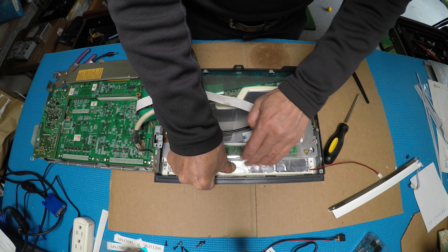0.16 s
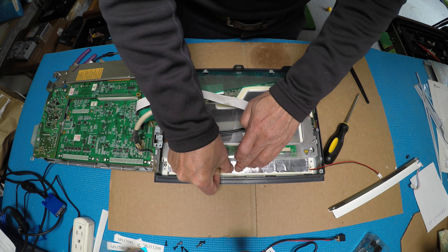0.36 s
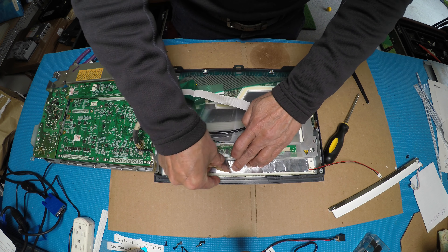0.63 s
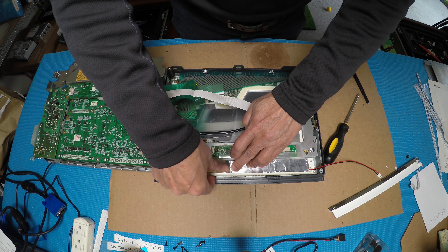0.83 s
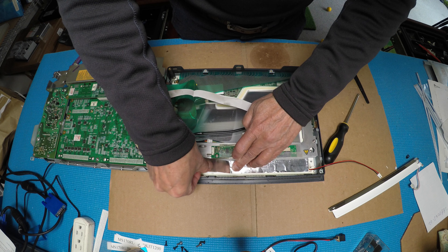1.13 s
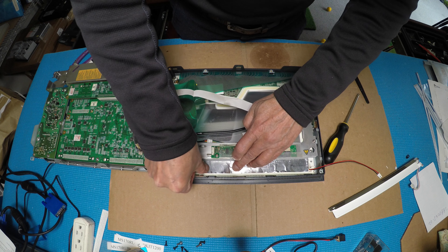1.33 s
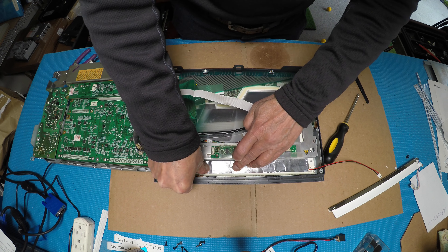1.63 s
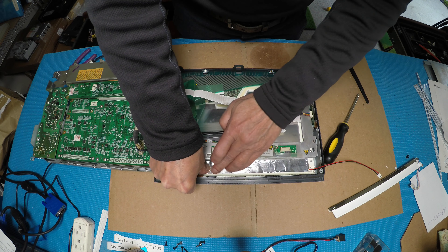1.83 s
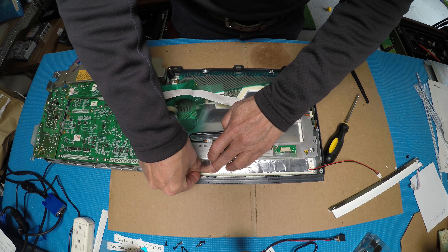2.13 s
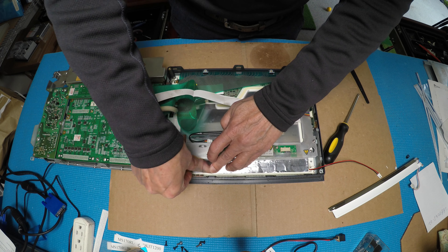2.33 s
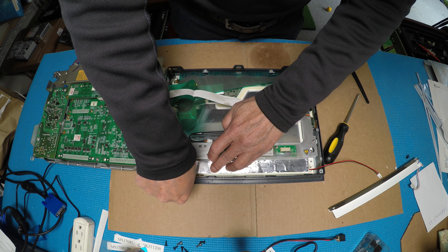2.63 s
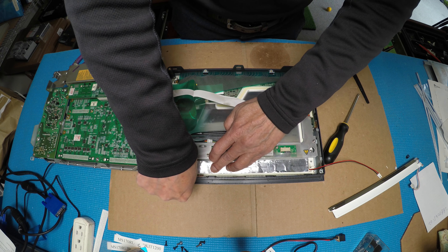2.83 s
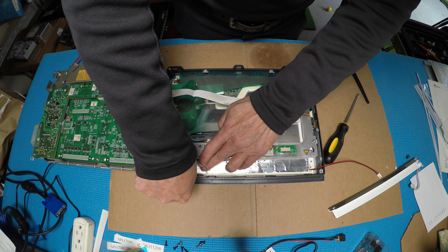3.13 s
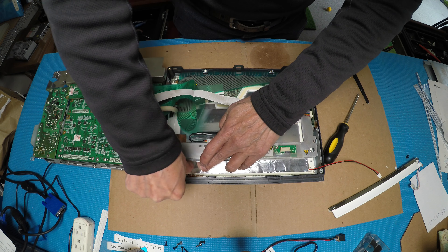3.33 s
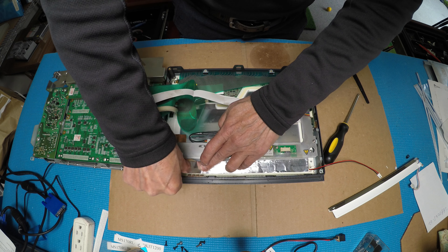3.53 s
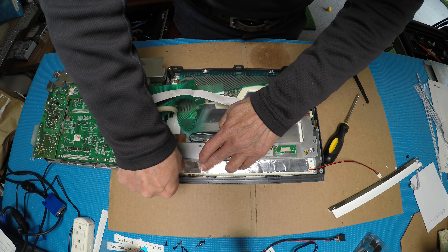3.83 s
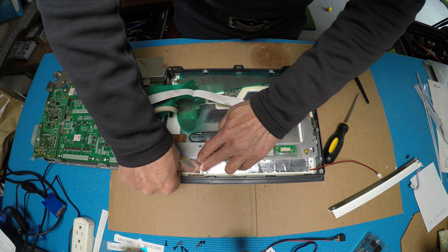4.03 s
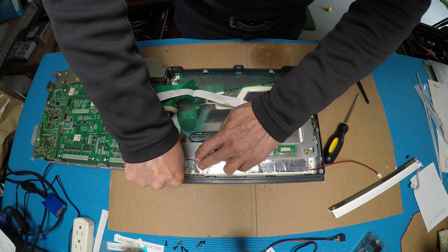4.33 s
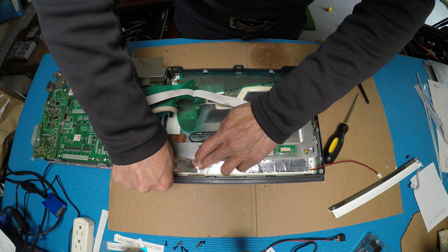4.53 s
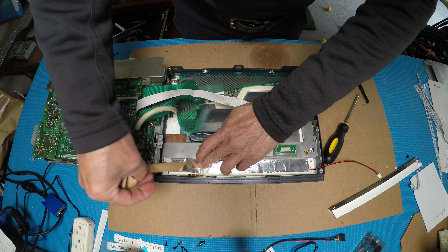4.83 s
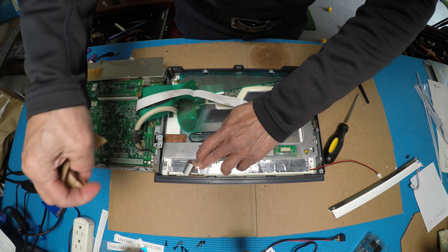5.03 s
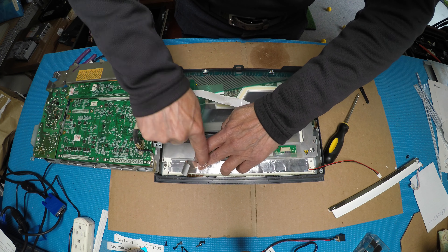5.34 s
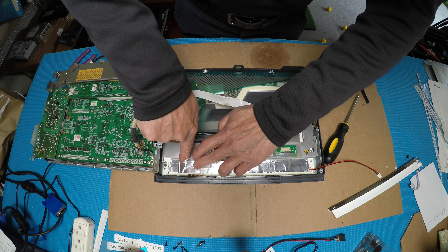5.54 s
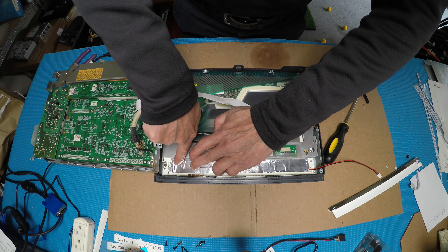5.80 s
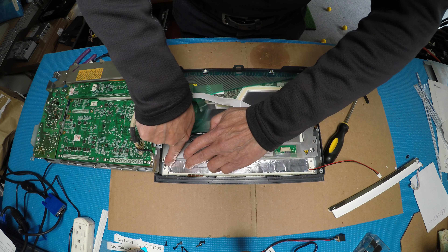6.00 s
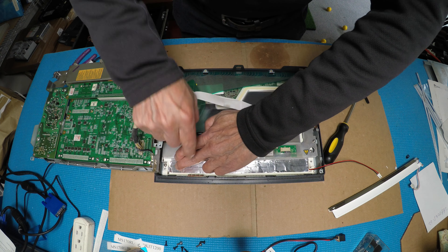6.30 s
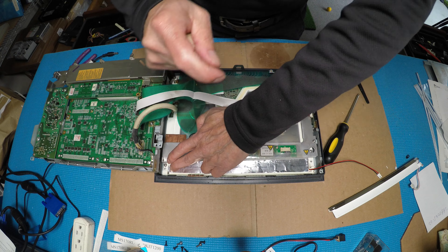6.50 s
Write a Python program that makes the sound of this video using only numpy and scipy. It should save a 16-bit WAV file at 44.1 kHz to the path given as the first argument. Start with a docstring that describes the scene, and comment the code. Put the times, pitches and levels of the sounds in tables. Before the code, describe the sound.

Fingers press and rub crinkly foil tape onto a metal frame, with crisp creases snapping and soft low bench bumps in a quiet room.

```python
"""A workbench in a room, heard by a camera's two microphone ports on an overhead arm.
Below, fingers press and rub foil tape onto a metal frame: strokes are clumped friction noise ringing
foil and frame, and folding creases snap as short pitched flips with fizz. Pushes knock the bench and swing
the arm, decaying sines that reach the ports in opposite phase. Room air and rumble, both shaped noise, lie below."""
import sys
import numpy as np
from scipy import signal
from scipy.fft import rfft, irfft, next_fast_len
from scipy.io import wavfile
from scipy.ndimage import uniform_filter1d, map_coordinates

SR = 44100
rng = np.random.default_rng(int(sys.argv[2]) if len(sys.argv) > 2 else 0)


def output_pcm(signal):
    """Save a mono or channel-first signal as 16-bit PCM at the path in sys.argv[1].

    Samples are clipped to [-1, 1] before scaling.
    """
    pcm = np.clip(np.atleast_2d(signal).T, -1, 1) * 32767
    wavfile.write(sys.argv[1], SR, np.round(pcm).astype(np.int16))


N = 293873
OPPOSED = np.array([[1], [-1]])  # left and right port in opposite phase


def amp(db):
    """Gain of a dB value."""
    return 10 ** (np.asarray(db) / 20)


def unit(x):
    """Scaled to rms 1."""
    return x / np.sqrt(np.mean(x ** 2) + 1e-20)


def along(points, hz):
    """(Hz, value) points read on a log frequency axis."""
    f, v = np.transpose(points)
    return np.interp(np.log(hz + 1), np.log(f + 1), v)


def curves(rows):
    """One value per sample for each column after the time."""
    s, *cols = np.transpose(rows)
    return [np.interp(np.arange(N) / SR, s, c) for c in cols]


def wobble(rate):
    """A smooth random curve, rate knots a second."""
    knots = rng.standard_normal(int(N * rate / SR) + 4)
    return map_coordinates(knots, [np.arange(N) * rate / SR])


def filtered(x, response):
    """x times a complex response of frequency."""
    m = next_fast_len(N + SR // 2)
    return irfft(rfft(x, m) * response(np.fft.rfftfreq(m, 1 / SR)), m)[..., :N]


def resonant(x, modes):
    """x through parallel (Hz, width Hz, dB) resonances, neighbours with opposite sign."""
    def response(f):
        total = 0
        for k, (centre, width, db) in enumerate(modes):
            damping = 1j * f * width
            total = total + (-1) ** k * amp(db) * damping / (centre ** 2 - f ** 2 + damping)
        return total
    return filtered(x, response)


def coloured(spectrum):
    """Noise of rms 1 with a (Hz, dB) spectrum."""
    return unit(filtered(rng.standard_normal(N), lambda hz: amp(along(spectrum, hz))))


# Rumble in the room. Each row: time in seconds, level in dB before its random lumps.
RUMBLE_LEVEL = [(0, -62), (.55, -41), (1.4, -42), (2.2, -49.5), (2.85, -44.5), (3.05, -34), (3.75, -36.5),
                (4.5, -45), (5.1, -53.5), (6.66, -52.5)]
# Colour of the rumble. Each row: frequency in Hz, relative density in dB per Hz.
RUMBLE_COLOUR = [(10, -17), (18, -1.5), (55, -1.5), (160, -22.5), (700, -120)]
# The arm's low sway, opposed at the ports, passed twice. Each row: frequency in Hz, width in Hz, relative dB.
SWAY_MODES = [(51, 29, 20), (97.5, 23, 2)]
# Room air common to both ports. Each row: frequency in Hz, relative density in dB per Hz.
AIR_COMMON = [(53, -15), (90, -22), (148, 5), (450, -11), (1200, -18.5), (4800, -25), (6800, -23.5),
              (10500, -28), (16000, -45)]
# Room air opposed between the ports. Each row: frequency in Hz, relative density in dB per Hz.
AIR_OPPOSED = [(90, -19.5), (122, -33), (196, -7.5), (219, -25), (753, -20), (2830, -40), (14000, -51.5)]


def air():
    """Steady noise of the room air, and a lumpy rumble partly shared and partly opposed at the ports."""
    common = amp(-51.0) * coloured(AIR_COMMON)
    opposed = amp(-48.0) * coloured(AIR_OPPOSED)
    lumps_db = 2 * wobble(5) + 3 * wobble(14)
    level = amp(curves(RUMBLE_LEVEL)[0] + lumps_db)
    shared = level * coloured(RUMBLE_COLOUR)
    sway = unit(resonant(resonant(rng.standard_normal(N), SWAY_MODES), SWAY_MODES))
    sway = amp(-6.0) * level * sway
    left = shared + sway + common + opposed
    right = 1.08 * (shared - sway) + common - opposed
    return np.array([left, right])


def scrape(spike_db=3, clump_db=1.2, patch_db=3.5):
    """Friction: noise with bigger slips in clumps, its colour shifting in patches as the foil bends."""
    clumps_db = clump_db * (wobble(60) + wobble(250))
    slips = amp(spike_db * rng.exponential(size=N) + clumps_db)
    z = signal.stft(slips * rng.standard_normal(N), nperseg=256)[2]
    patches = uniform_filter1d(rng.standard_normal(z.shape), size=3, axis=0)  # across frequency
    patches = uniform_filter1d(patches, size=30, axis=1)  # across time
    return signal.istft(z * amp(patch_db * unit(patches)), nperseg=256)[1][:N]


def wrinkles(count):
    """Tiny wrinkles, each a few fast-dying cycles at a pitch of its own; rms 1 together."""
    when, pitch = rng.random(count), rng.standard_normal(count)
    size = np.minimum(rng.exponential(size=count), 3)[:, None]
    hz = np.minimum(6200 * np.exp(.35 * pitch), SR / 4)[:, None]
    t = np.arange(200) / SR
    decay = amp(5.9 * size - 60 * t * hz / 12)  # falls 60 dB in 12 cycles
    grains = decay * np.sin(2 * np.pi * hz * t) * (1 - np.exp(-t / .0001))
    places = (when * N).astype(int)[:, None] + np.arange(len(t))
    return unit(np.bincount(places.ravel(), grains.ravel(), N + SR)[:N])


# Resonances of the foil. Each row: frequency in Hz, width in Hz, relative level in dB.
FOIL_MODES = [(4380, 2300, -15), (6100, 630, -3.5), (7150, 666, -2.5), (9680, 1230, -14), (12900, 830, -24)]
# Resonances of the metal frame. Each row: frequency in Hz, width in Hz, relative level in dB.
FRAME_MODES = [(1096, 410, 3), (2287, 330, 10.5), (3694, 480, 8)]
# Finger strokes. Each row: start in seconds, length in seconds, rustle in relative dB,
# frame ring against rustle in relative dB, crest as a share of the length (0-1, kept within .05-.95).
STROKES = [(0.006, 0.41, -62, 2.5, 0.27), (0.245, 0.094, -47, -3, 0.23), (0.324, 0.12, -45.5, -2, 0.07),
           (0.416, 0.17, -49, -3, 0.45), (0.594, 0.22, -40.5, -6, 0.21), (0.758, 0.1, -51, -5, 0.1),
           (0.918, 0.26, -47, -7, 0.13), (1.017, 0.23, -42.5, -8, 0.91), (1.964, 0.072, -49, 3, 0.2),
           (2.035, 0.068, -52, 5.5, 0.44), (2.097, 0.097, -47, -2, 0), (2.187, 0.13, -39.5, -9.5, 0.36),
           (2.299, 0.26, -49, -9.5, 0), (2.504, 0.1, -49.5, -6, 0.43), (2.675, 0.34, -47.5, -5.5, 0.04),
           (2.966, 0.11, -57.5, -6, 0.36), (3.24, 0.22, -58.5, -5, 0.24), (3.619, 0.18, -49, -5.5, 0.89),
           (3.792, 0.25, -54, -9.5, 0), (4.194, 0.18, -56.5, -6.5, 0.3), (4.514, 0.16, -45, -8, 0.24),
           (4.611, 0.22, -46, -7.5, 0.01), (4.791, 0.058, -41.5, -8, 0.74), (4.851, 0.036, -27.5, -7, 0.26),
           (4.87, 0.078, -39.5, -5.5, 0.22), (4.93, 0.14, -47.5, -5.5, 0.5),
           (5.034, 0.065, -39.5, -1, 0.78), (5.137, 0.053, -53, 1.5, .4), (5.503, 0.04, -54.5, -3, 0.55),
           (5.636, 0.098, -57.5, -5.5, 0.6), (5.867, 0.32, -58.5, -1, 0.09), (6.162, 0.098, -49.5, -1, 1),
           (6.247, 0.11, -52, -1.5, 0.5), (6.567, 0.089, -52, -2.5, 0.52)]
HOLD = 1.67  # flatness of a stroke's crest
DAMPING = 0.86  # dB that the foil's top modes lose for each dB of frame ring


def strokes():
    """Skin on foil: slips ring the foil and the frame under it; more frame ring dulls the foil."""
    press = np.zeros((3, N))  # on the foil's body, its top modes and the frame
    for s, length, db, frame_db, crest in STROKES:
        span = slice(round(s * SR), min(round((s + length) * SR), N))
        way = np.linspace(0, 1, span.stop - span.start)
        crest = np.clip(crest, .05, .95)
        shape = np.clip(HOLD * np.minimum(way / crest, (1 - way) / (1 - crest)), 0, 1)
        shape = np.sin(shape * np.pi / 2) ** 2  # swells and fades without corners
        levels_db = db + np.array([[0], [-DAMPING * frame_db], [frame_db]])
        press[:, span] += amp(levels_db) * shape
    body, top, under = press * amp(1.8 * wobble(22))  # the finger catches and slides
    slips = np.array([unit(scrape()), unit(scrape())])  # two stretches of the tape
    frame = under * unit(resonant(scrape(), FRAME_MODES))
    crackle = amp(-10) * body * wrinkles(count=2500)
    foil_body = amp(14.5) * body * resonant(slips, FOIL_MODES[:3])
    foil_top = amp(11.5) * top * resonant(slips, FOIL_MODES[3:])
    return foil_body - foil_top + frame + crackle


# The arm, one row: frequency in Hz, left gain in dB, right gain in dB, time to fall 60 dB in seconds.
ARM_MODE = (191.7, 5.84, 12.3, 0.31)
# Ringing of the bench. Each row: frequency in Hz, left gain in dB, right gain in dB, 60 dB fall in seconds.
BENCH_MODES = [(358.3, 17.5, -10, 0.2), (433, 9.5, 3.5, 0.32), (493, -3, -16.5, 0.085),
               (672, 2, -34, 0.082), (808, -3.5, -17, 0.064)]
# Pushes on the bench. Each row: start in seconds, arm swing in dB before the port gains,
# knock against swing in dB before its scatter and port gains, brightness of the knock in dB per octave.
PUSHES = [(0.08, -20.5, -36.5, 0), (0.252, -18.5, -36, 3), (0.369, -23, -28, 7), (0.682, -45, 4, 3),
          (0.706, -45.5, 3, 1), (0.789, -23, -16.5, -3), (1.048, -15.5, -23, 5), (1.698, -26.5, -39.5, 0),
          (1.879, -16.5, -25.5, -16), (1.98, -21.5, -17, 10.5), (2.03, -20.5, -23.5, -11),
          (2.658, -19.5, -46.5, 7), (2.779, -24.5, -17, 3.5), (2.819, -22.5, -22, -17),
          (2.997, -24.5, -31, 0), (4.187, -34, -25.5, 7), (4.632, -36, -15, 17.5)]
WIND_UP_S = 0.0058  # rise of the swing when knock and swing are equal
WIND_UP_SLOPE = 0.46  # dB slower for each dB that the knock is softer


def pushes():
    """Each push knocks the bench's modes and winds up the arm, which swings on over a soft random stir."""
    out, t = np.zeros((2, N + SR)), np.arange(SR // 2) / SR
    drift = 1.2 * wobble(9)  # the arm's phase drift (rad)
    blur = .035  # loose parts blur the bench's ring: random phase step (rad per sample)
    hz, left_db, right_db, t60 = ARM_MODE
    ports = amp([[left_db], [right_db]]) * OPPOSED
    for s, db, knock_db, bright_db in PUSHES:
        start = round(s * SR)
        span = slice(start, start + len(t))
        rise = max(WIND_UP_S * amp(-WIND_UP_SLOPE * knock_db), .003)
        swing = (1 - np.exp(-(t / rise) ** 2)) * amp(db - 60 * t / t60)
        # the phase follows the scene's clock, in step with the running swing
        phase = 2 * np.pi * hz * (t + start / SR) + np.resize(drift[start:], len(t))
        out[:, span] += ports * swing * np.sin(phase)
        for mode_hz, l_db, r_db, life in BENCH_MODES:
            scatter_db = rng.normal(0, 2.5)
            tilt_db = bright_db * np.log2(mode_hz / BENCH_MODES[0][0])
            ring = amp(db + knock_db + scatter_db + tilt_db - 60 * t / life)
            ring = ring * (1 - np.exp(-t / 0.0012))
            phase = 2 * np.pi * mode_hz * t + np.cumsum(blur * rng.standard_normal(len(t)))
            out[:, span] += amp([[l_db], [r_db]]) * OPPOSED * ring * np.sin(phase)
    stir = unit(resonant(rng.standard_normal(N), [(hz, 14, 0)]))
    return out[:, :N] + ports * amp(-53 + 0.45 * wobble(2.4)) * stir


# Creases snapping. Each row: start in seconds, strength in relative dB, pitch in Hz.
SNAPS = [(0.0816, -21.5, 7740), (0.232, -20.5, 6560), (0.275, -18.5, 6370), (0.3361, -10, 7140),
         (0.436, -28.5, 3500), (0.4561, -30.5, 2050), (0.4926, -12.5, 6160), (0.624, -10, 7150),
         (0.6608, -17, 6740), (0.676, -14, 6950), (0.701, -16, 7200), (0.729, -22, 2350),
         (0.7508, -3, 5620), (0.893, -25, 6940), (0.9348, -14, 6740), (0.98, -14, 4950),
         (1.0219, -13.5, 7000), (1.72, -23, 7260), (1.875, -31, 3230), (2.048, -31.5, 2600),
         (2.2633, -16, 7550), (2.337, -22.5, 7580), (2.6954, -15.5, 7250), (2.776, -21, 3540),
         (2.99, -26.5, 6500), (3.029, -30, 6000), (3.131, -24.5, 3680), (3.167, -29, 6800),
         (3.188, -28.5, 4730), (3.6938, -23, 4000), (3.804, -18, 7060), (3.909, -24, 7040),
         (4.127, -26, 7740), (4.211, -26.5, 7040), (4.276, -25, 7100), (4.412, -30.5, 3030),
         (4.584, -19, 8850), (4.6301, -17, 3650), (4.665, -21, 7600), (4.702, -24, 5510),
         (4.792, -16.5, 7000), (4.8214, -23, 3680), (4.8434, -4, 6850), (4.8869, -10, 2410),
         (5.155, -33, 2270), (5.227, -17.5, 6650), (5.269, -26, 5500), (5.775, -10.5, 6940),
         (5.983, -23.5, 4730), (6.237, -19.5, 6800), (6.365, -36, 2140), (6.446, -28, 4730),
         (6.482, -29, 6750), (6.618, -28.5, 4500)]
# The dull body of a jolt, one row: frequency in Hz, width in Hz, relative level in dB.
THUD_MODE = (370, 340, -9)


def snaps():
    """A crease flips: a few cycles at its pitch, a short fizz, and a jolt into foil and frame."""
    out, jolt, t = np.zeros(N + SR), np.zeros(N + SR), np.arange(SR // 25) / SR
    rise = 1 - np.exp(-t / 0.00071)
    for s, db, hz in SNAPS:
        start = round(s * SR)
        span = slice(start, start + len(t))
        cycles = hz * t - 1.5
        flip = np.cos(2 * np.pi * cycles) * np.exp(-(cycles / 1.65) ** 2)
        band = signal.butter(3, [hz * 0.7, min(hz * 1.41, 18000)], "band", fs=SR)
        fizz = unit(signal.lfilter(*band, rng.standard_normal(len(t))))
        fizz = fizz * np.exp(-t / 0.0021) * rise
        # hard snaps have more clean flip against the fizz
        out[span] += amp(db) * (amp(0.2 * (db - 10)) * flip + 0.2 * fizz)
        burst = amp(db - 60 * t / 0.025) * rng.standard_normal(len(t)) * rise
        jolt[span] += burst * (4000 / hz) ** 2.03  # low-pitched, big creases jolt more
    out, jolt = out[:N], jolt[:N]
    foil = amp(-1.0) * resonant(jolt, FOIL_MODES)
    frame = amp(-15.0) * resonant(jolt, FRAME_MODES)
    return out + foil + frame + resonant(jolt, [THUD_MODE])


# Shading by the camera body, before each port's share. Each row: frequency in Hz, left against right in dB.
PORT_SHADE = [(1900, 5.5), (3000, 0), (6800, 1.5), (8800, -11), (11500, -2.5)]
# Scatter by the housing between the ports. Each row: frequency in Hz, angle in rad before the cap at a
# quarter turn.
PORT_TURN = [(4200, 0.094), (8000, 1.68), (13000, 1.5)]


def ports_hear(x, elsewhere):
    """The body shades each port; the right hears treble phase-scattered and from another stretch of tape."""
    knots = rng.standard_normal(40)

    def turn(hz):
        return np.clip(along(PORT_TURN, hz), 0, np.pi / 2)

    def right_response(hz):
        scatter = map_coordinates(knots, [hz / hz[-1] * (len(knots) - 1)])
        heard = amp(-along(PORT_SHADE, hz) * 0.63) * np.exp(1j * turn(hz) * scatter)
        return heard * [np.cos(turn(hz)), np.sin(turn(hz))]  # shares of the two stretches

    left = filtered(x, lambda hz: amp(along(PORT_SHADE, hz) * 0.67))
    right = filtered(np.array([x, elsewhere]), right_response).sum(axis=0)
    return np.array([left, right])


# Decay of the room. Each row: frequency in Hz, time to fall 60 dB in seconds.
ROOM_DECAY = [(1000, 0.44), (14000, 0.26)]


def room(x):
    """The room's answer is a noise tail, each frequency dying at its own speed."""
    hz, t, z = signal.stft(rng.standard_normal((2, SR // 3)), SR, nperseg=256)
    decay = amp(-60 * t / along(ROOM_DECAY, hz)[:, None])
    tail = signal.istft(z * decay, SR, nperseg=256)[1]
    tail = tail / np.linalg.norm(tail[0])
    delayed = np.pad(x, (200, 0))[None]  # 200 samples late
    return signal.fftconvolve(delayed, tail, axes=1)[:, :N]


def scene():
    """Foil, bench and room at the two ports."""
    foil, elsewhere = strokes() + snaps()
    return ports_hear(foil, elsewhere) + amp(-10.0) * room(foil) + pushes() + air()


TOP_HZ = 16400  # band limit


def record(dry):
    """The microphones fade in the top octave; nothing is kept above the band limit."""
    return filtered(dry, lambda hz: (hz < TOP_HZ) / np.sqrt(1 + (hz / 14500) ** 16))


dry = scene()
out = record(dry)
output_pcm(out)
```